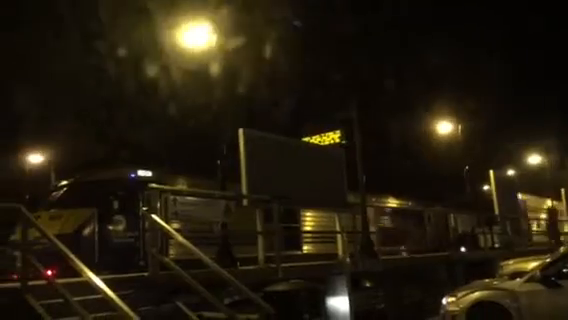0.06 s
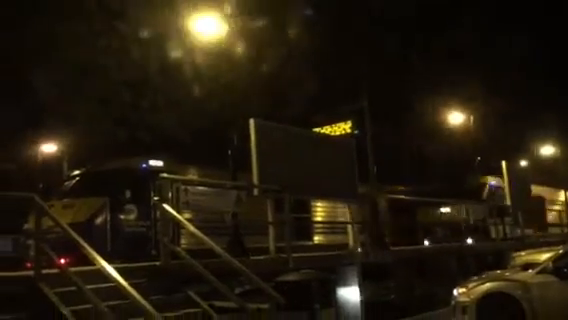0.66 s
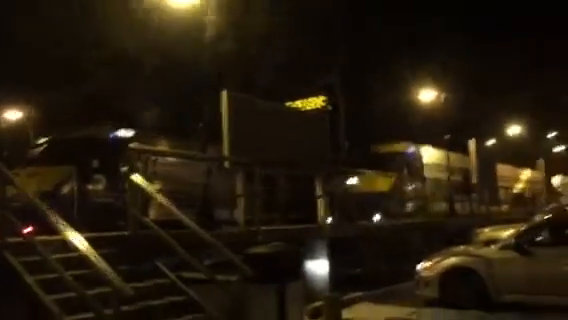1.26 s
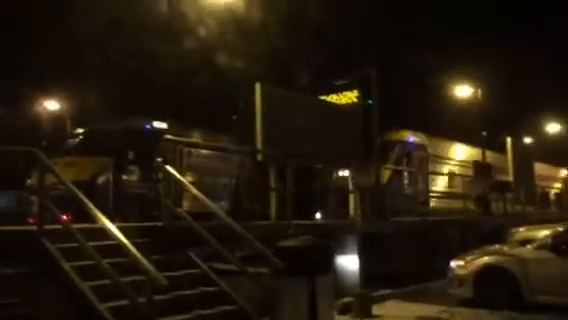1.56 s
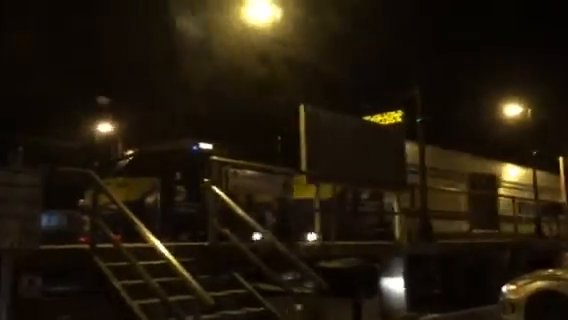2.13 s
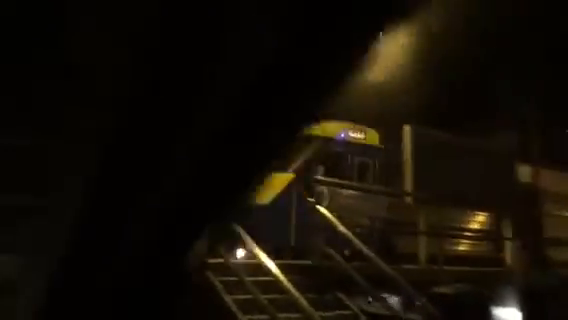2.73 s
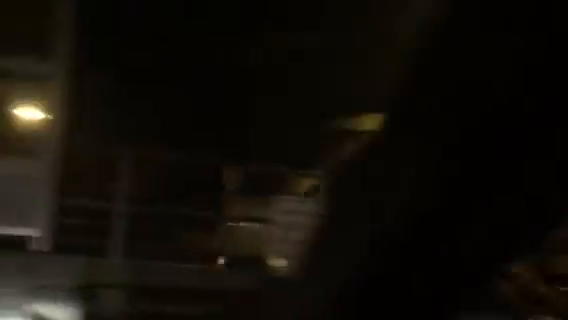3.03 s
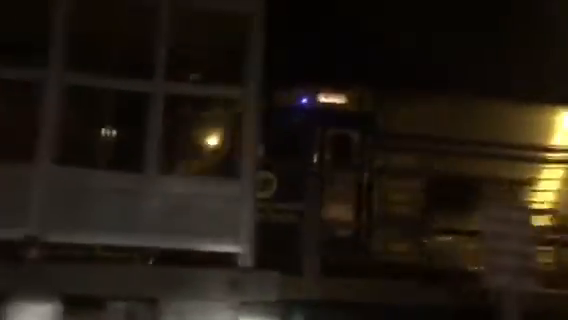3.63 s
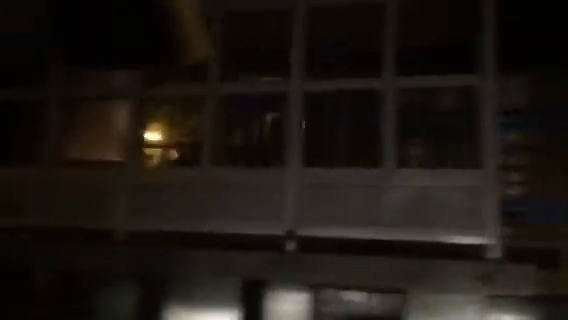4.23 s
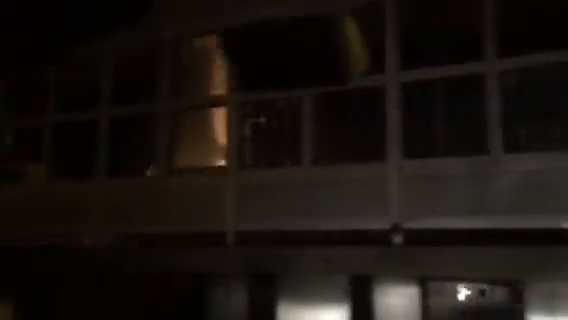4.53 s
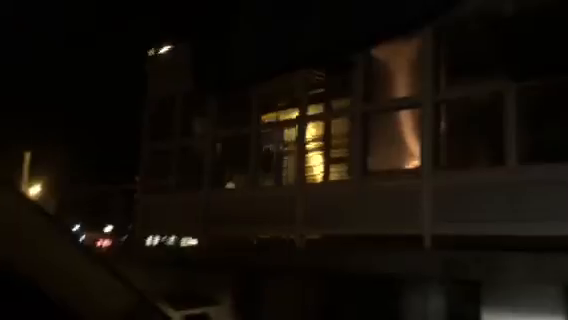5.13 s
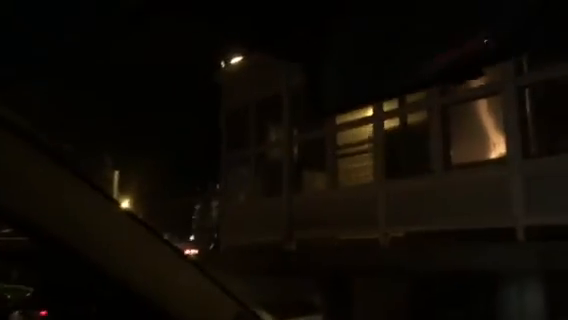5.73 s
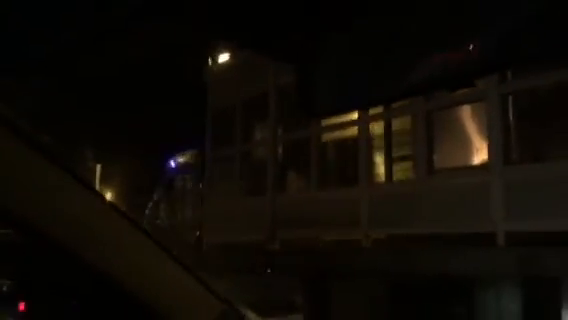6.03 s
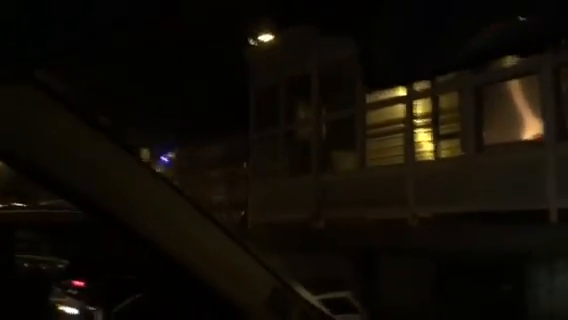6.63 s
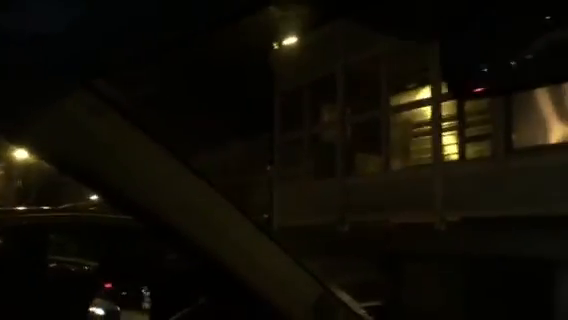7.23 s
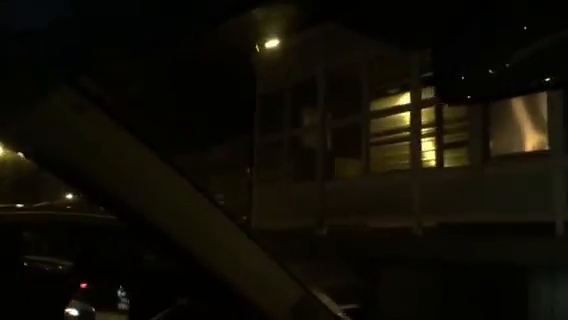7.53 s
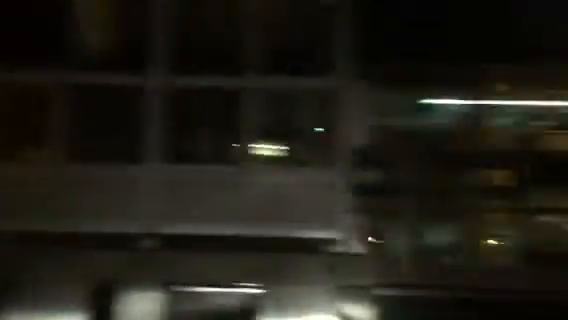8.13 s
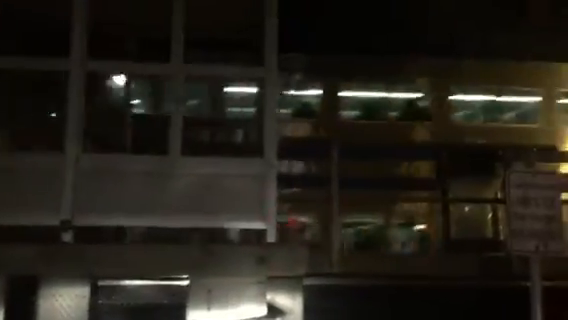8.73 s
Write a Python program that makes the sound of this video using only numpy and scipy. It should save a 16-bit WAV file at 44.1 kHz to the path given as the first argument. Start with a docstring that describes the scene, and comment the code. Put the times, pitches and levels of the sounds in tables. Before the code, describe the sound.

A low diesel engine drone pulses throughout, dull and boxy as heard from within a slowly rolling car beside passing trains. Clothing brushes near the microphone early on, one stroke ending in a knock. Three short, thin brake squeaks come from outside, the last the clearest. The arriving locomotive keeps booming in waves, with faint ringing from the coach wheels and light ticks in the cabin.

```python
"""A low diesel boom throbs over a dull rumble: a station at night, from a slowly rolling car, windows shut.
One locomotive idles and is left behind while a second draws in and winds down; their crank orders
swell in the cabin, and the coaches' wheels ring as they follow. Close to the microphone, cloth rubs
in a run of strokes, one ending in a knock. A dragging brake squeaks three times and the trim
ticks faintly."""
import sys
import numpy as np
from scipy import signal
from scipy.fft import rfft, irfft, next_fast_len
from scipy.io import wavfile
from scipy.ndimage import uniform_filter1d

SR = 44100
rng = np.random.default_rng(int(sys.argv[2]) if len(sys.argv) > 2 else 0)


def to_wav(s):
    """Save 16-bit WAV."""
    ch = np.atleast_2d(s).T  # columns
    pcm = np.round(np.clip(ch, -1, 1) * 32767)  # PCM
    wavfile.write(sys.argv[1], SR, pcm.astype(np.int16))


N = 387198
TIME = np.arange(N) / SR

# Faders of the noise bed. Each row: time in seconds, then body drone, rolling noise and air rush in dB.
BED_LEVELS = [(0, -41.5, -53.5, -56.5), (2.3, -40, -53.5, -56), (2.8, -42.5, -53.5, -62),
              (3.7, -40.5, -51.5, -54.5), (4.4, -40, -51, -56), (5.4, -45, -54.5, -55.5),
              (5.85, -42, -53.5, -56.5), (6.5, -46, -54, -57), (7.7, -48, -55.5, -58),
              (8.6, -40.5, -52, -55)]
# Tone colours of the bed's four layers. Each row: frequency in Hz, relative level in dB.
EXHAUST_SPECTRUM = [(20, -20), (36, -15.5), (47, -4), (65, -3), (84, -7.5), (95, -2.5), (130, -1.5),
                    (152, -12.5), (200, -29.5)]
BODY_SPECTRUM = [(110, -27.5), (155, -2.5), (180, 1.5), (215, -3), (245, -6.5), (272, -6), (320, -9),
                 (380, -11.5), (450, -23.5), (700, -41)]
ROLLING_SPECTRUM = [(280, -7.5), (420, -0.5), (490, 2), (600, -0.5), (800, -4.5), (1000, -6), (1500, -22)]
AIR_SPECTRUM = [(700, -14), (1020, -5), (1250, 2), (1420, 3), (1600, 3), (1950, -1.5), (2500, -5),
                (3100, -14), (4000, -20), (4900, -25.5), (6200, -27), (9000, -31), (10500, -33),
                (15000, -34)]
# Reflections off windows and roof. Each row: delay in seconds, level in dB before the send gain.
REFLECTIONS = [(.0047, -12), (.0113, -11), (.0187, -12), (.031, -13)]
# Running gear resonances, shifting as the locomotive gives way to coaches.
# Each row: centre in Hz, width in Hz, level in dB, start and end in seconds.
GEAR_RINGS = [(1673, 135, -62, -.5, 2.2), (2370, 99, -64.5, -.5, 2.6), (1234, 90, -62.5, 4.6, 8.4),
              (1538, 130, -65.5, 4.5, 9), (1766, 90, -68.5, 5.5, 9.7), (2277, 190, -66.5, 1.5, 8.3),
              (2770, 200, -69, 4.5, 6.8)]

# Whines of brakes and running gear. Each row: start and length in seconds, pitch in Hz, level in dB.
WHINES = [(2.908, 0.067, 4070, -57), (2.95, 0.32, 1130, -61), (3.6, 0.45, 1103, -64),
          (4.02, 0.6, 2370, -61), (4.8, 0.51, 2370, -62), (6.1, .95, 480, -57.5)]
# Brake squeaks. Each row: start and length in seconds, pitch in Hz, level in dB.
SQUEAKS = [(2.917, 0.28, 2476, -57.5), (3.843, 0.31, 2425, -54.5), (4.755, 0.26, 2405, -47)]
# A squeak's partials. Each row: multiple of the pitch, relative level in dB, share of the length.
SQUEAK_PARTIALS = [(0.88, -7, 0.43), (0.998, -1.5, 0.9), (1.663, -16, .55)]

# Trim ticks. Each row: start in seconds, strength in dB, brightness in dB per octave.
TICKS = [(3.2744, -50, -5.5), (5.905, -65, 13), (6.416, -57.5, 1), (6.8563, -58, 2), (7.1099, -62, 2),
         (7.3901, -58.5, -2), (8.4612, -61.5, 4)]
# Knocks on the trim panel. Each row: start in seconds, strength in dB.
KNOCKS = [(.657, -45), (.975, -43), (1.5995, -27.5), (1.6095, -29)]
# Modes of ticks and knocks. Each row: pitch in Hz, relative level in dB, seconds to die by 60 dB.
TICK_MODES = [(3340, 0, 0.056), (3870, 0.5, 0.06), (4080, -4.5, .025), (7100, -10, .02)]
PANEL_MODES = [(180, -6.5, .2), (282, -9, 0.14), (361, -7.5, 0.19), (489, -18, 0.12), (745, -5.5, 0.079),
               (967, -9, 0.067), (1077, -8, 0.058), (1445, -9, 0.049), (2000, -5, 0.018),
               (2440, -11.5, .03), (3220, -13, .015)]

# Cloth strokes. Each row: start and hold in seconds, level in dB.
STROKES = [(.17, 0.16, -71.5), (0.612, 0.023, -48), (.68, 0.088, -49), (.8, .13, -58.5),
           (0.962, 0.035, -52), (1.066, 0.08, -54), (1.193, 0.19, -44.5), (1.37, 0.19, -45.5),
           (1.53, 0.043, -44.5), (1.83, 0.16, -58), (2.007, 0.4, -47), (2.3, 1.3, -58.5),
           (2.496, 0.091, -53.5), (2.702, 0.13, -50), (2.86, .08, -56), (3.065, 0.21, -54.5),
           (3.302, 0.18, -57), (3.506, 0.18, -52), (3.76, 0.17, -64), (4.038, 0.022, -50.5),
           (4.195, 0.5, -66.5), (4.747, .5, -77.5), (6.883, 0.26, -76.5), (7.998, 0.45, -73)]
# Short scuffs. Each row: time of the peak and half-length in seconds, level in dB.
SCUFFS = [(3.048, 0.0073, -48), (6.747, 0.043, -48.5)]
# Tone colours of the cloth's three layers. Each row: frequency in Hz, relative level in dB.
HISS_SPECTRUM = [(400, 4), (900, -7), (1500, 6), (2400, 5.5), (3000, 4.5), (4300, 3), (4900, -0.5),
                 (6100, 3), (7600, -1.5), (9200, 1), (10000, -2), (10450, -5.5), (11400, -1.5), (15000, -4)]
SCRAPE_SPECTRUM = [(300, -6.5), (700, -3), (1300, -3), (2000, -6), (3500, -9.5)]
SCUFF_SPECTRUM = [(1000, 2), (1900, 5), (2700, 7.5), (3500, -7.5), (4600, -13), (6000, -37)]
# Crossovers between the flickering bands of the hiss, in Hz.
FOLD_EDGES_HZ = [1800, 2800, 3800, 5200, 6800, 9000]

# The idling engine's note. Each row: multiple of crank speed, level in dB at its nearest.
IDLE_ORDERS = [(7, -30.5), (9, -36.5), (12, -50), (20, -61)]
# Its nearness. Each row: time in seconds, gain in dB.
IDLE_NEARNESS = [(0, 0), (1.7, -10), (4.6, -28), (8.78, -24)]
# The arriving engine's boom, swelling and cancelling as engine and car move.
# Each row: time in seconds, then the 6th, 7th and 9th crank orders in dB.
BOOM_LEVELS = [(0.0, -85, -65, -38), (1.4, -51, -34, -37), (2.1, -42, -42, -29.5), (2.59, -50, -35, -27.5),
               (3.19, -55, -31, -27.5), (3.59, -46, -29.5, -31), (3.79, -45, -27.5, -28.5),
               (3.99, -58, -29, -31), (4.19, -39, -38.5, -35.5), (4.99, -41, -27.5, -31.5),
               (5.59, -55, -31.5, -26), (5.99, -45, -29.5, -31.5), (6.19, -43.5, -29.5, -25.5),
               (6.98, -39.5, -48.5, -24.5), (7.58, -46, -32, -27.0), (8.18, -53.5, -31.5, -26.5),
               (8.38, -33, -52, -35), (8.78, -37.5, -51, -21)]
# Its weaker orders. Each row: multiple of crank speed, top level in dB, time of that top in seconds.
OVERTONES = [(8, -38, 4.3), (11, -43, 0.77), (14, -44.5, 5.4), (15, -49.5, 7.6), (16, -49.5, 5.5),
             (17, -51, 6.6), (22, -47, 4.9), (33, -50, 7.1)]


def from_db(db):
    return 10 ** (np.asarray(db) / 20)


def unit_rms(x):
    return x / np.sqrt(np.mean(x ** 2) + 1e-20)


def automation(rows):
    """Breakpoints (seconds first) drawn out into one curve for each further column."""
    times, *columns = np.transpose(rows)
    return [np.interp(TIME, times, column) for column in columns]


def drift(rate_hz):
    """A smooth random wobble with a spread of 1."""
    hop, run_in = 40, 2000
    pole = np.exp(-2 * np.pi * hop * rate_hz / SR)
    white = rng.standard_normal(N // hop + run_in + 2)
    slow = signal.lfilter([1], [1, -2 * pole, pole * pole], white)[run_in:]
    return np.interp(np.arange(N) / hop, np.arange(len(slow)), unit_rms(slow))


def coloured(x, spectrum):
    """EQ to a spectrum, rolling off 12 dB per octave beyond its ends; rms 1."""
    size = next_fast_len(N)
    hz = np.maximum(np.arange(size // 2 + 1) * SR / size, 1)
    points_hz, db = np.transpose(spectrum)
    skirts = np.minimum(1, np.minimum(hz / points_hz[0], points_hz[-1] / hz)) ** 2
    curve = from_db(np.interp(np.log(hz), np.log(points_hz), db))
    return unit_rms(irfft(rfft(x, size) * skirts * curve, size)[:N])


def noise(spectrum):
    """Steady coloured noise; rms 1."""
    return coloured(rng.standard_normal(N), spectrum)


def swell(start, length, skew=1):
    """A rounded rise and fall; a skew below 1 brings the peak forward."""
    return np.sin(np.pi * np.clip((TIME - start) / length, 0, 1) ** skew)


def in_cabin(x, send_db=-5.5):
    """Short reflections turn the sound boxy without changing its level."""
    echoes = sum(from_db(db + send_db) * np.interp(TIME - delay, TIME, x, left=0)
                 for delay, db in REFLECTIONS)
    return np.std(x) * unit_rms(x + echoes)


def rumble(turns, exhaust_db=-37):
    """Exhaust turbulence puffs twice a crank turn; wheels and air add a muffled rush."""
    body_db, rolling_db, air_db = automation(BED_LEVELS)
    puff = np.cos(4 * np.pi * turns)
    exhaust = from_db(exhaust_db + 0.3 * puff) * noise(EXHAUST_SPECTRUM)
    body = from_db(body_db + 0.92 * puff) * noise(BODY_SPECTRUM)
    rolling = from_db(rolling_db + 1.3 * drift(8.2)) * noise(ROLLING_SPECTRUM)
    air = from_db(air_db + 0.5 * drift(33)) * noise(AIR_SPECTRUM)
    return exhaust + body + in_cabin(rolling + air)


def running_gear(fade_s=0.55):
    """Rough rails keep wheels and bogies ringing, each resonance swelling on its own."""
    out = np.zeros(N)
    for hz, width_hz, db, start, end in GEAR_RINGS:
        band = signal.butter(2, [hz - width_hz / 2, hz + width_hz / 2], "band", fs=SR, output="sos")
        passing = np.clip(np.minimum(TIME - start, end - TIME) / fade_s, 0, 1)
        level = passing * from_db(db + 2.3 * drift(11))
        out += level * unit_rms(signal.sosfilt(band, rng.standard_normal(N)))
    return out


def friction_tone(hz, jitter):
    """A sine whose pitch trembles by the fraction `jitter`; rms 1."""
    trembling_hz = hz * (1 + jitter * drift(90))
    return np.sqrt(2) * np.sin(2 * np.pi * np.cumsum(trembling_hz) / SR)


def brake():
    """A dragging brake squeaks once a wheel turn, each time a little lower; faint whines come and go."""
    out = np.zeros(N)
    rough_db = 4.5 * drift(70)
    for start, length, hz, db in SQUEAKS:
        for multiple, partial_db, share in SQUEAK_PARTIALS:
            level = from_db(db + partial_db + rough_db) * swell(start, length * share, skew=0.63)
            out += level * friction_tone(hz * multiple, jitter=0.0056)
    for start, length, hz, db in WHINES:
        level = from_db(db + 2.2 * drift(24)) * swell(start, length)
        out += level * friction_tone(hz, jitter=0.006)
    return out


def strike(hits, modes):
    """Each hit rings every mode of the trim, a little harder or softer by chance."""
    out, t = np.zeros(N), TIME[:SR // 3]
    for start, db in hits:
        at = round(start * SR)
        for k, (hz, mode_db, t60) in enumerate(modes):
            gain = from_db(db + mode_db + rng.normal(0, 1.5)) * (-1) ** k  # alternating polarity
            ring = np.exp(-np.log(1000) * t / t60) * np.sin(2 * np.pi * hz * t)
            out[at:at + len(t)] += gain * ring[:N - at]
    return out


def trim_ticks():
    """The trim ticks; a sharper tick favours the higher modes."""
    out = np.zeros(N)
    lowest_hz = TICK_MODES[0][0]
    for start, db, tilt in TICKS:
        modes = [(hz, mode_db + tilt * np.log2(hz / lowest_hz), t60) for hz, mode_db, t60 in TICK_MODES]
        out += strike([(start, db)], modes)
    return out


def stroke_envelope(rise_db_per_s=195, fall_db_per_s=154.5, rounding_s=0.037):
    """Each stroke rises, holds and falls with rounded corners; the strongest one sounds. In dB."""
    strokes_db = []
    for start, hold, db in STROKES:
        attack_db = rise_db_per_s * np.maximum(start - TIME, 0)
        release_db = fall_db_per_s * np.maximum(TIME - start - hold, 0)
        strokes_db.append(db - attack_db - release_db)
    return uniform_filter1d(np.max(strokes_db, axis=0), int(rounding_s * SR))


def folds(hiss, flicker_db=1.3, rate_hz=16):
    """Moving folds shift the cloth's colour: each band flickers on its own."""
    lows = [signal.sosfiltfilt(signal.butter(2, hz, fs=SR, output="sos"), hiss) for hz in FOLD_EDGES_HZ]
    bands = [upper - lower for lower, upper in zip([0] + lows, lows + [hiss])]
    return sum(band * from_db(flicker_db * drift(rate_hz)) for band in bands)


def cloth(firm_stroke_db=-44, firm_scrape_db=-47):
    """Fibres catch and slip by the thousand: a grainy hiss, with a duller scrape when pressed hard."""
    stroke_db = stroke_envelope()
    slips = rng.standard_normal(N) * from_db(drift(250))
    scrape_db = firm_scrape_db + 2.9 * (stroke_db - firm_stroke_db)  # only firm strokes bite
    scrape = from_db(scrape_db + 2.4 * drift(60)) * noise(SCRAPE_SPECTRUM)
    hiss = from_db(stroke_db) * folds(coloured(slips, HISS_SPECTRUM))
    scuff_level = sum(from_db(db) * swell(peak - half, 2 * half) for peak, half, db in SCUFFS)
    return hiss + scrape + scuff_level * noise(SCUFF_SPECTRUM)


def crank_order(turns, order, db, waver_db):
    """One harmonic of the exhaust note; uneven firing makes its level waver."""
    return np.sqrt(2) * from_db(db + waver_db * drift(10)) * np.sin(2 * np.pi * order * turns)


def idling_engine(crank_hz=8.155):
    """The standing locomotive holds its speed and is left behind."""
    near_db, = automation(IDLE_NEARNESS)
    turns = crank_hz * TIME + rng.random()
    return sum(crank_order(turns, order, db + near_db, waver_db=2.5) for order, db in IDLE_ORDERS)


def winding_down(rest_hz=8.0, extra_hz=1.245, time_constant_s=2.8):
    """Running count of crank turns as the arriving engine settles toward its resting speed."""
    return np.cumsum(rest_hz + extra_hz * np.exp(-TIME / time_constant_s)) / SR


def arriving_engine(turns, fade_db_per_s=3.5, wander_turns=0.004):
    """Three low orders boom, the 7th and 9th beating twice a turn; uneven firing blurs the overtones."""
    sixth_db, seventh_db, ninth_db = automation(BOOM_LEVELS)
    boom = crank_order(turns, order=6, db=sixth_db, waver_db=4.5)
    boom += crank_order(turns, order=7, db=seventh_db, waver_db=0.1)
    boom += crank_order(turns, order=9, db=ninth_db, waver_db=-0.2)
    for order, top_db, top_s in OVERTONES:
        uneven_turns = turns + rng.random() + wander_turns * drift(6.6)
        level_db = top_db - fade_db_per_s * abs(TIME - top_s)
        boom += crank_order(uneven_turns, order, level_db, waver_db=3.5)
    return boom


def scene():
    """The trains outside and the small sounds inside the car, mixed in mono."""
    turns = winding_down()
    trains = arriving_engine(turns) + idling_engine() + rumble(turns) + running_gear() + brake()
    inside = cloth() + strike(KNOCKS, PANEL_MODES) + trim_ticks()
    return (trains + inside)[None]


def record(dry, fade_in_s=0.006, cutoff_hz=15250):
    """A quick fade-in and a steep cut of the top end."""
    fade_in = np.sin(np.pi / 2 * np.minimum(TIME / fade_in_s, 1)) ** 2
    high_cut = signal.ellip(12, 0.1, 90, cutoff_hz, fs=SR, output="sos")
    return signal.sosfilt(high_cut, dry * fade_in)


dry = scene()
out = record(dry)
to_wav(out)
```